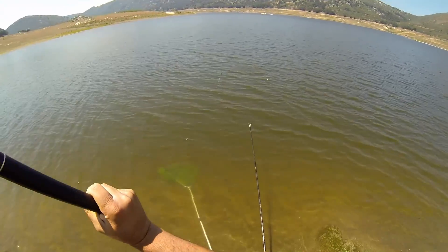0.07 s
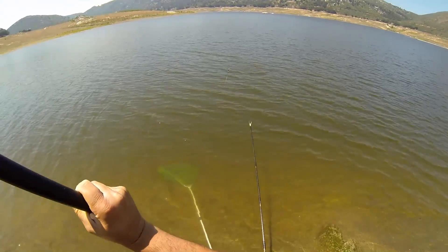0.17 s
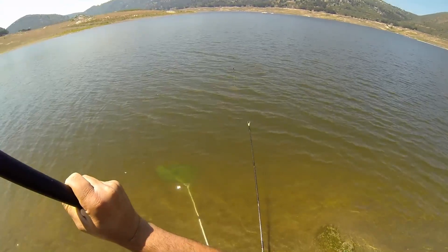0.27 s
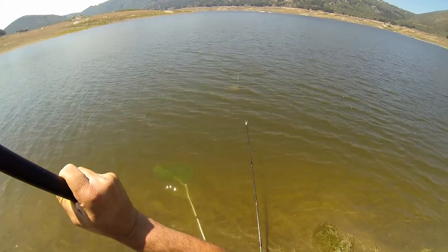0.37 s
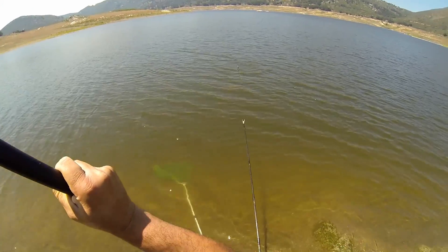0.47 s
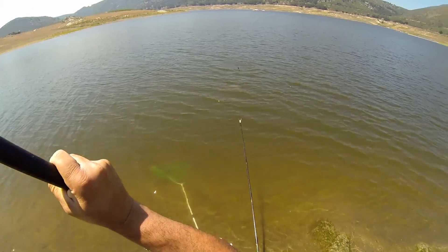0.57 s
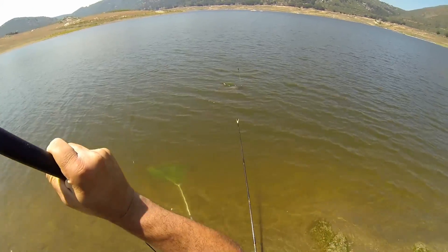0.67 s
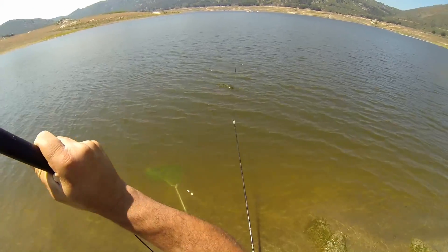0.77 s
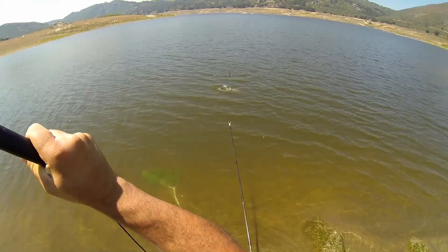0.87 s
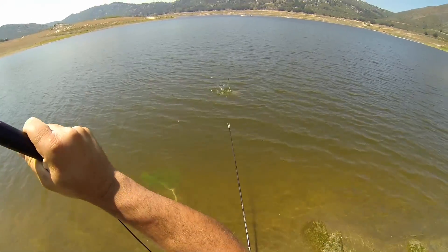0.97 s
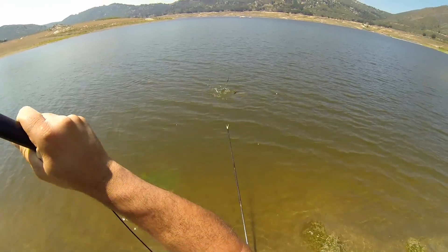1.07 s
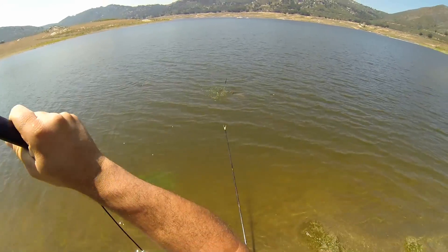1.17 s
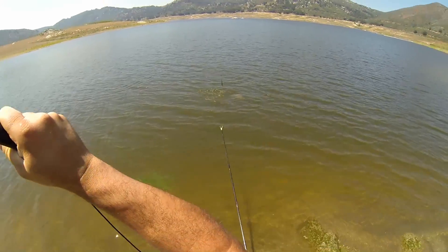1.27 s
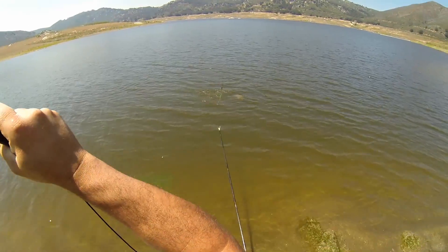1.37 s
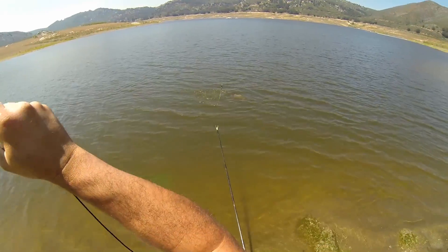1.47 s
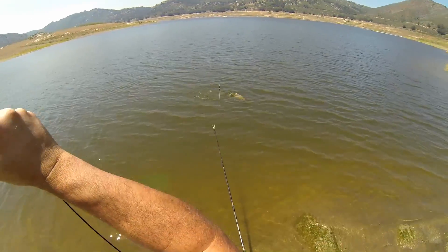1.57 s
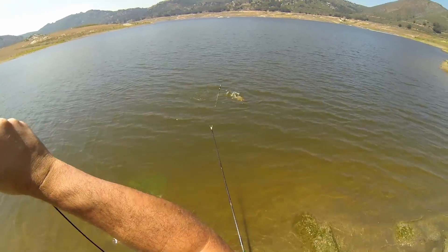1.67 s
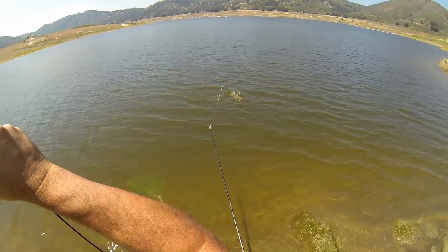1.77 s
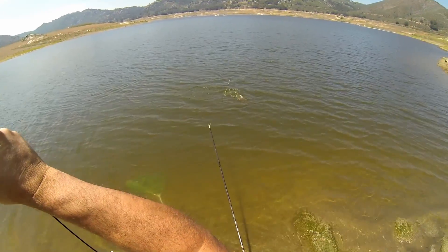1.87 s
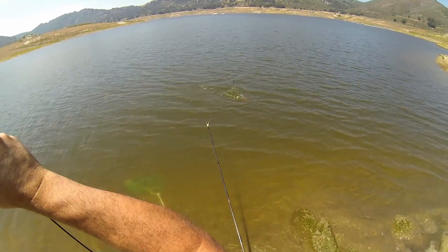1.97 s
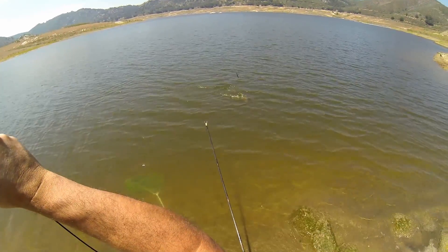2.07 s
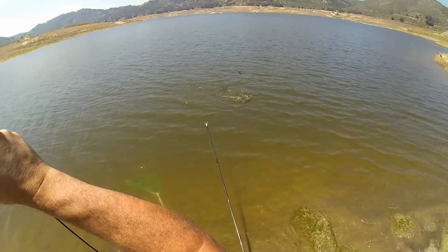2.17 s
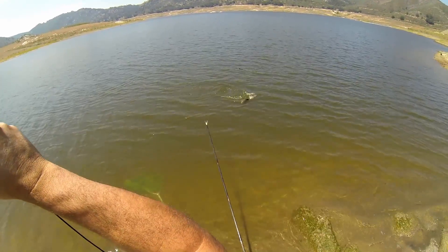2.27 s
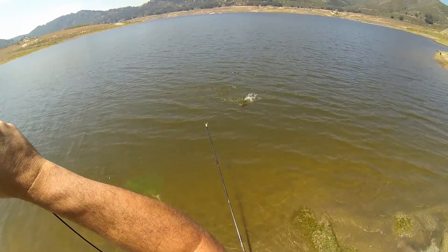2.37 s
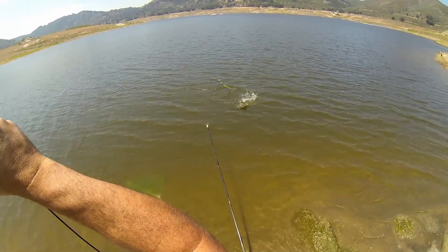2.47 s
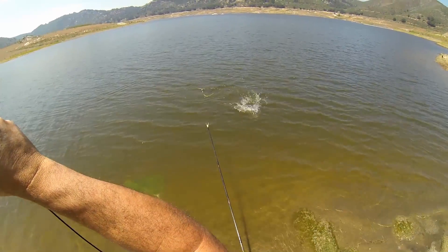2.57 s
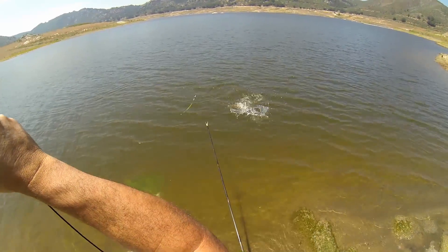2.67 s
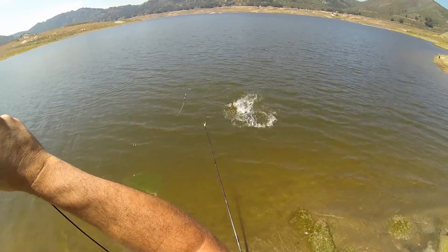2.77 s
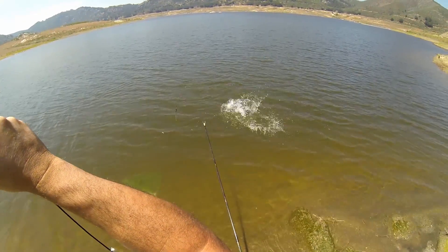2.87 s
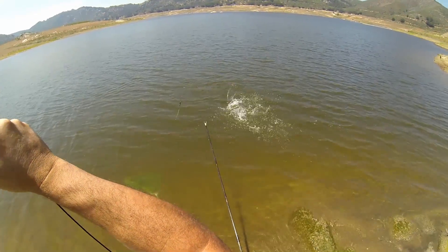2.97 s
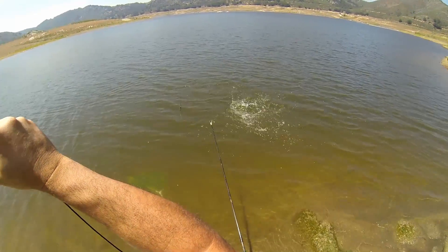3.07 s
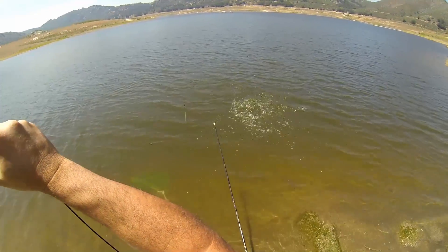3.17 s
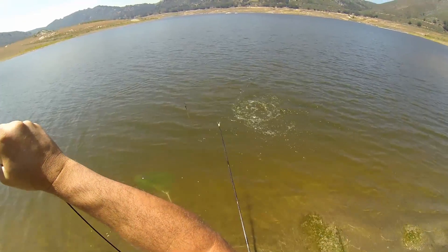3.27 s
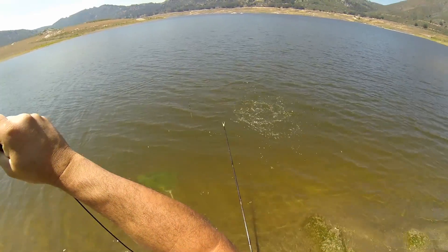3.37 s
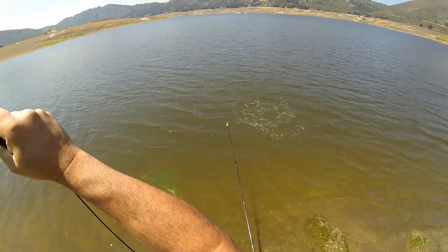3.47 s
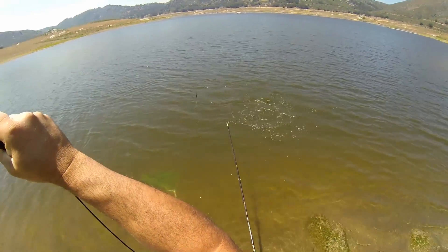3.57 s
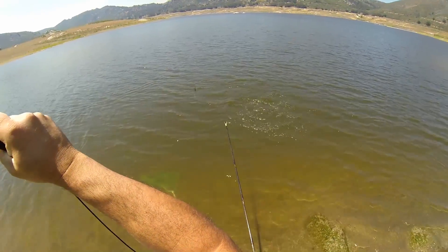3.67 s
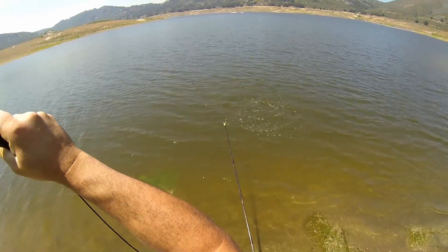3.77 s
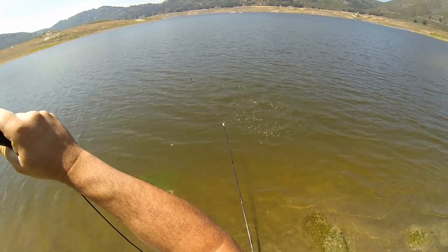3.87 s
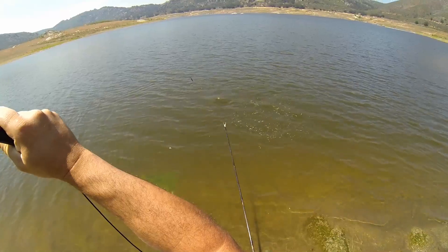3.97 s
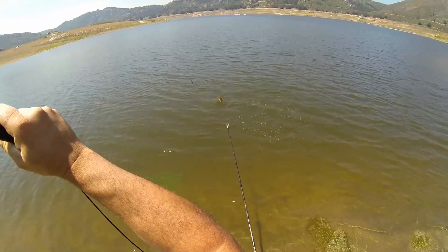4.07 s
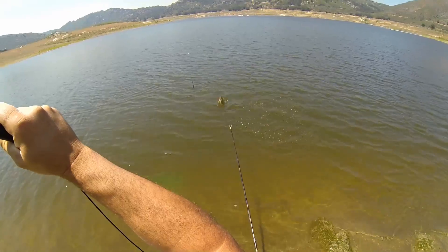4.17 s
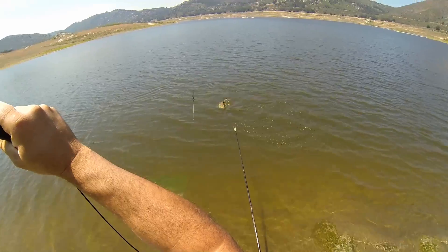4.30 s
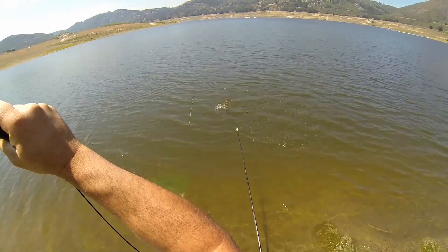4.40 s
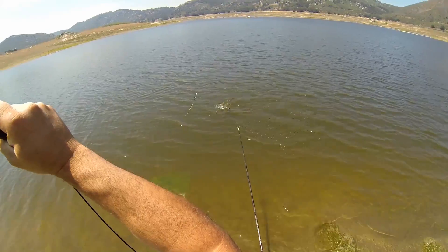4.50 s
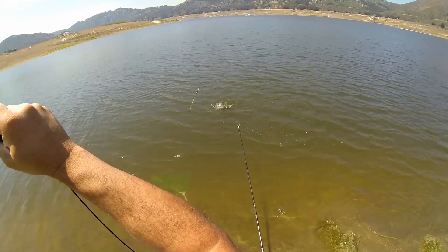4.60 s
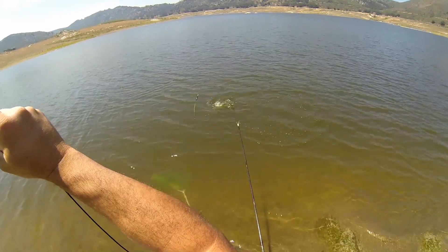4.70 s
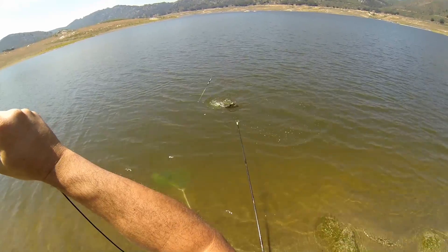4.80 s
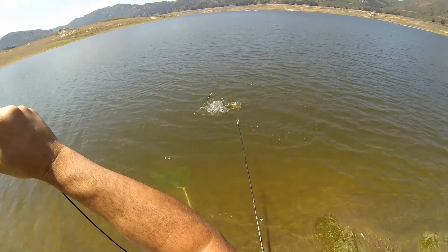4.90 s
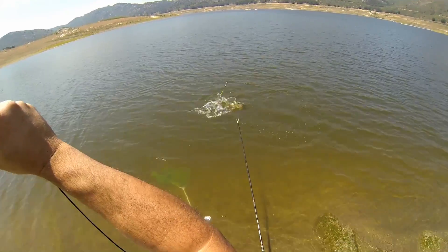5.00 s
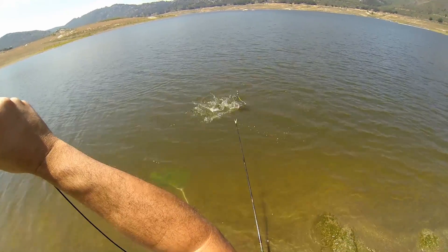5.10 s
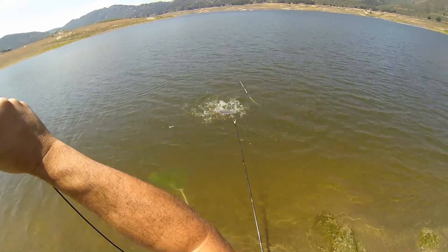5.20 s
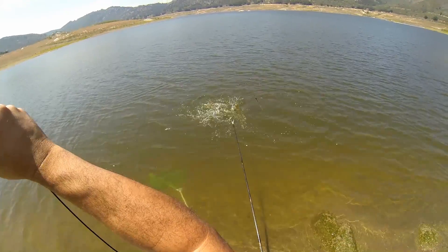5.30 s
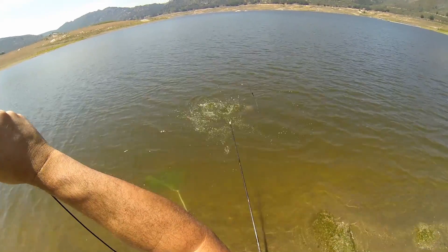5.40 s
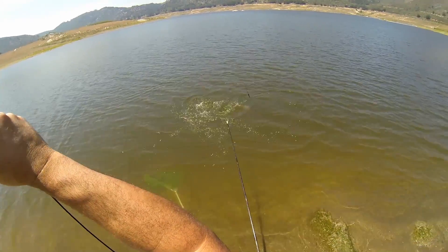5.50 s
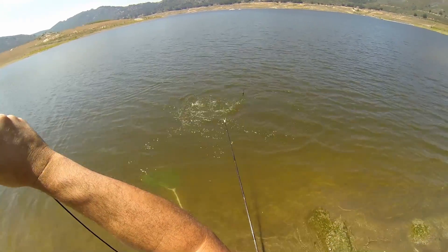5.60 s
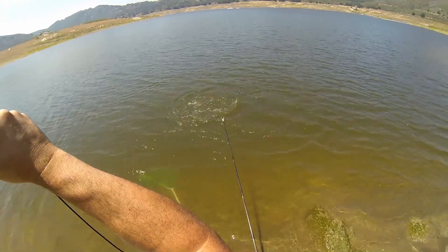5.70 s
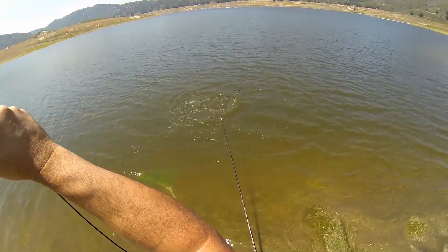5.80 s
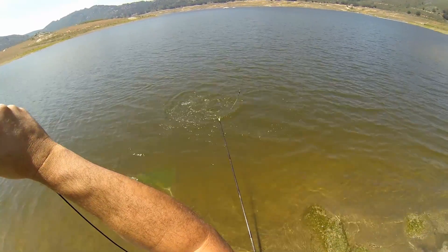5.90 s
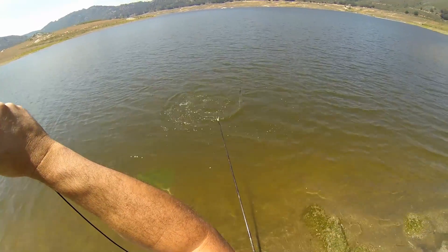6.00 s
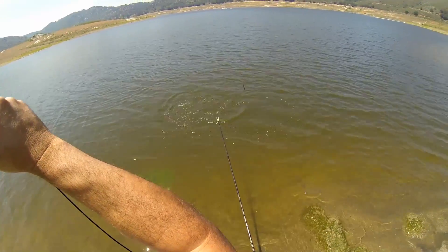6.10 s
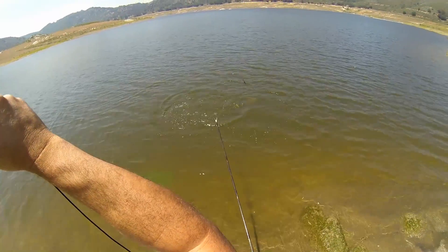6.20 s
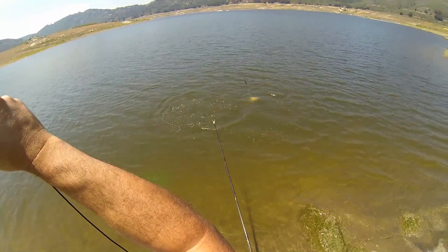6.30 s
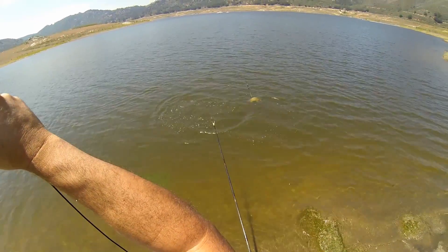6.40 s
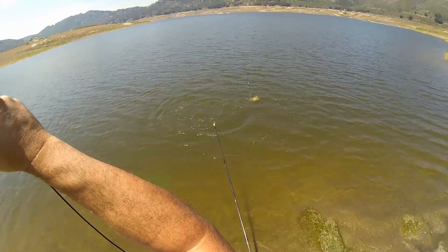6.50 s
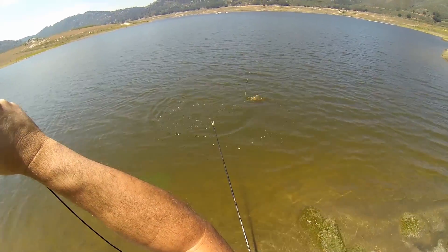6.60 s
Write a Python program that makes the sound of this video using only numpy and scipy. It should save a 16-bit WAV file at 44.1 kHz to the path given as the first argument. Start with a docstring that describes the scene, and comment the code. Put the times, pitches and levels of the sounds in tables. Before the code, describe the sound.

Outdoors on a lake, small gurgles and sharp slaps come from a fish fighting at the surface a few metres away. It thrashes harder, its body hitting the water with a heavy plunk, then pauses. A second, longer stretch of churning and spray fades into isolated plops. The small mono microphone also picks up soft wind rumble, slight hiss, a very faint distant cricket and a low hum near the end.

```python
"""A lake: a hooked fish thrashes at the surface, a few metres from a small head-worn camera with one mic.
Air pockets ring and glide in pitch, the tail slaps, the body slams, froth churns, spray patters back.
Light wind rumbles on the housing, a cricket trills far off, and a low hum comes and goes near the end.
The camera adds its own hiss and a thin whine."""
import sys
import numpy as np
from scipy import signal
from scipy.fft import rfft, irfft, next_fast_len
from scipy.io import wavfile
from scipy.ndimage import uniform_filter1d, map_coordinates

SR = 44100
rng = np.random.default_rng(int(sys.argv[2]) if len(sys.argv) > 2 else 0)


def wav_record(signal):
    """Record a signal, one row per channel, as 16-bit PCM in the file named by sys.argv[1]."""
    frames = np.transpose(np.atleast_2d(signal))
    bounded = np.clip(frames, -1, 1)
    # unit amplitude maps onto the largest positive 16-bit level
    quanta = np.round(bounded * 32767).astype(np.int16)
    wavfile.write(sys.argv[1], SR, quanta)


N = 293265


def amp(db):
    """dB to gain."""
    return 10 ** (np.asarray(db) / 20)


def unit(x):
    """x at rms 1."""
    return x / np.sqrt(np.mean(x ** 2) + 1e-20)


def curves(rows):
    """Each column after t/s, interpolated per sample."""
    t_s, *columns = np.transpose(rows)
    return [np.interp(np.arange(N) / SR, t_s, column) for column in columns]


def wobble(rate_hz):
    """Smooth random curve through Gaussian knots."""
    knots = rng.standard_normal(int(N * rate_hz / SR) + 4)
    return map_coordinates(knots, [np.arange(N) * rate_hz / SR])


def filtered(x, response):
    """x through a zero-phase gain response(f/Hz)."""
    n_fft = next_fast_len(N + 8192)
    return irfft(rfft(x, n_fft) * response(np.fft.rfftfreq(n_fft, 1 / SR)), n_fft)[..., :N]


def coloured(x, spectrum):
    """x shaped by (f/Hz, level/dB) rows, rms 1."""
    f_hz, db = np.transpose(spectrum)
    return unit(filtered(x, lambda hz: amp(np.interp(np.log(hz + 1), np.log(f_hz + 1), db))))


def patchy(x, depth_db=2):
    """x with random gain patches in time and frequency, rms 1."""
    spectra = signal.stft(x, nperseg=256)[2]
    patches = uniform_filter1d(rng.standard_normal(spectra.shape), size=5, axis=0)
    patches = unit(uniform_filter1d(patches, size=8, axis=1))
    return unit(signal.istft(spectra * amp(depth_db * patches), nperseg=256)[1][:N])


def glide(rows):
    """Sine following (t/s, f/Hz, level/dB) rows, silent outside them."""
    hz, db = curves(rows)
    t = np.arange(N) / SR
    active = (t > rows[0][0]) * (t < rows[-1][0])
    return amp(db) * active * np.sin(2 * np.pi * np.cumsum(hz) / SR)


def rings(onset_s, gain, hz, t60_s, rise_oct_s, attack_s, samples):
    """Sum of damped, gliding sines. A bubble's pitch climbs as it nears the surface."""
    t = np.arange(samples) / SR
    onset_s, gain, hz, t60_s, rise_oct_s, attack_s = (
        np.reshape(v, (-1, 1)) for v in (onset_s, gain, hz, t60_s, rise_oct_s, attack_s))
    octaves = rise_oct_s * t
    pitch_hz = hz * 2 ** np.clip(octaves, -2, 1.5)
    burst_fade = np.clip(4 * (1.5 - octaves), 0, 1)  # a bubble bursts at about triple its pitch
    envelope = gain * amp(-60 * t / t60_s) * (1 - np.exp(-t / attack_s)) * burst_fade
    waves = envelope * np.sin(2 * np.pi * np.cumsum(pitch_hz, axis=1) / SR)
    index = np.round(onset_s * SR).astype(int) + np.arange(samples)
    return np.bincount(index.ravel(), waves.ravel(), N + samples)[:N]


def swarm(count, lo_hz, hi_hz, cycles, spread_db, samples):
    """Random bubbles, a few much stronger than the rest; rms 1."""
    when, pitch, life, strength = rng.random((count, 4)).T
    hz = lo_hz * (hi_hz / lo_hz) ** pitch
    t60_s = cycles * (0.5 + 2.34 * life) / hz
    gain = amp(-spread_db * np.log(strength + 0.01)) * hz / hi_hz
    return unit(rings(when * N / SR, gain, hz, t60_s, 0.7 / t60_s, 0.5 / hz, samples))


def wind():
    """Lumpy rumble of wind on the housing."""
    spectrum = [(8.8, -21), (15, 2), (25, -2), (38, -4), (129, -16), (147, -27.5), (176, -31.5), (251, -28),
                (287, -23.5), (448, -36), (490, -28), (520, -39), (680, -36), (1140, -120)]  # rumble shape: f/Hz, level/dB
    gusts = [(0.0, -40), (0.22, -48), (0.31, -43), (0.46, -54), (0.52, -47), (0.63, -53.5), (0.7, -48),
             (0.91, -57.5), (0.93, -53), (1.41, -51), (1.44, -46.5), (1.55, -55), (2.0, -47), (2.11, -52.5),
             (2.56, -51.5), (2.63, -58), (2.68, -48.5), (2.85, -57), (2.87, -54), (3.18, -56), (4.2, -50.5),
             (4.52, -54.5), (4.58, -49.5), (5.61, -54), (5.72, -52), (5.85, -56.5), (6.13, -48.5),
             (6.18, -55.5), (6.48, -48.5), (6.65, -56.5)]  # rumble strength: t/s, level/dB
    buffeting = amp(1.44 * wobble(11) + 0.39 * wobble(4.9))
    rumble = unit(buffeting * coloured(rng.standard_normal(N), spectrum))
    return amp(curves(gusts)[0]) * rumble


def camera(hiss_db=-62, whine_hz=10645, whine_db=-88):
    """Self-noise: steady hiss and a thin whine that wavers in level."""
    spectrum = [(82, -45), (140, 1), (282, -8.5), (448, -9), (697, -11.5), (989, -14), (2110, -17),
                (2940, -16), (4330, -22), (5010, -21), (6030, -25), (8880, -27.5), (10100, -31.5),
                (10900, -33), (11500, -46), (15000, -68), (22000, -120)]  # hiss shape: f/Hz, level/dB
    tone = np.sqrt(2) * np.sin(2 * np.pi * whine_hz * np.arange(N) / SR)
    whine = amp(whine_db + 1.5 * wobble(20)) * tone
    return amp(hiss_db) * coloured(rng.standard_normal(N), spectrum) + whine


def cricket(wing_hz=5165, strokes_per_s=47.94, level_db=-78):
    """Far trill: each wing stroke sags in pitch; every fifteenth is skipped."""
    stroke = np.arange(int(N / SR * strokes_per_s))
    stroke = stroke[stroke % 15 != 1]
    strength, detune = rng.standard_normal((len(stroke), 2)).T
    onset_s = np.clip((stroke - 0.2) / strokes_per_s, 0, None)
    hz = wing_hz * (1 + 0.005 * detune)
    song = rings(onset_s, amp(1.3 * strength), hz, t60_s=0.045, rise_oct_s=-3, attack_s=0.006, samples=900)
    return amp(level_db) * unit(song)


def thrash(patter_db=-13):
    """Froth (ringing bubbles) and spray (fizz grains, landing drops), each mixed with rushing noise."""
    churn = [(0.6, -96, -100), (0.83, -67, -89), (0.95, -62, -75), (1.08, -60, -75), (1.2, -61, -75),
             (1.41, -73, -85), (1.54, -62.5, -65), (1.73, -55.5, -65), (1.95, -63, -72.5), (2.07, -68, -77),
             (2.2, -59.5, -73), (2.4, -67, -77), (2.52, -54.5, -66), (2.64, -52, -59), (2.72, -46, -52),
             (2.85, -44.5, -52), (2.97, -42, -52.5), (3.1, -51.5, -58), (3.3, -63, -69.5),
             (3.45, -65, -103), (4.09, -75.5, -73), (4.29, -59, -66), (4.43, -63, -76), (4.59, -64.5, -67),
             (4.66, -52.5, -64.5), (4.74, -46, -63.5), (4.84, -50.5, -63), (4.94, -50.5, -59.5),
             (5.0, -44.5, -54.5), (5.13, -44.5, -53.5), (5.25, -48.5, -54.5), (5.36, -50.5, -55),
             (5.5, -55.5, -61), (5.56, -58, -66.5), (5.62, -59, -69), (5.75, -74, -78), (6.65, -104, -90)]  # churned water: t/s, froth level/dB, spray level/dB
    froth_shape = [(88, -50), (150, -11), (366, -7.5), (514, -4.5), (643, -3.5), (787, -7), (903, -3),
                   (1490, -7.5), (1900, -18.5), (2470, -23), (4180, -120)]  # froth spectrum: f/Hz, level/dB
    spray_shape = [(880, -45), (1500, -5), (1840, -11), (2110, -3), (2520, -12), (4000, -10.5), (5430, -20),
                   (6330, -22.5), (6900, -14), (8100, -17.5), (10300, -28.5), (10800, -28), (11500, -90),
                   (15000, -84), (22000, -120)]  # spray spectrum: f/Hz, level/dB
    froth = swarm(count=5000, lo_hz=198, hi_hz=2676, cycles=16.7, spread_db=2.2, samples=900)
    spray = swarm(count=14000, lo_hz=1787, hi_hz=11730, cycles=13.7, spread_db=2.0, samples=260)
    froth = patchy(coloured(froth + 2.0 * rng.standard_normal(N), froth_shape))
    spray = patchy(coloured(spray + 1.8 * rng.standard_normal(N), spray_shape))
    patter = swarm(count=1500, lo_hz=2470, hi_hz=10100, cycles=6.9, spread_db=3.5, samples=120)
    spray += amp(patter_db) * coloured(patter, spray_shape)
    surge = np.tanh(wobble(21.827))  # water falls in lumps
    froth_db, spray_db = curves(churn)
    sheet_froth, sheet_spray = sheets()
    froth_gain = amp(froth_db + 1.3 * surge) + sheet_froth
    spray_gain = amp(spray_db + 0.91 * surge + 2.0 * wobble(35)) + sheet_spray
    return froth_gain * froth + spray_gain * spray


def pockets(attack_cycles=0.65, attack_spread_db=4, waver_s=0.00008):
    """Large air pockets ring: some pop, others swell. Ripples shift the sound path, so pitch wavers."""
    air_pockets = [(0.838, -50, 1380, 0.033, -4), (0.848, -48.5, 2000, .04, 21),
                   (0.852, -44.5, 609, 0.17, -0.5), (0.883, -48.5, 1156, 0.069, 27),
                   (0.926, -33.5, 990, 0.025, 38), (0.929, -42, 1700, .02, 40), (.914, -44, 555, .04, 0),
                   (0.933, -39, 935, 0.057, 122), (0.94, -44, 1870, 0.027, -39),
                   (0.943, -45.5, 690, 0.24, 9), (0.953, -49, 1610, 0.028, 30),
                   (0.965, -46, 2200, 0.027, 3), (0.972, -51, 1100, 0.09, 0.5), (1.01, -39, 785, 0.035, 3),
                   (1.028, -45, 1990, 0.027, 34), (1.189, -47.5, 2140, 0.034, -3),
                   (1.585, -31.5, 564, 0.055, 13.5), (1.599, -37, 700, .035, 17),
                   (1.605, -35.5, 1560, 0.017, 1), (1.65, -46, 1070, 0.037, 18),
                   (1.66, -44, 1265, 0.08, -14.5), (1.691, -47, 843, .12, -1.5),
                   (1.719, -39.5, 1470, 0.037, 9), (1.725, -47.5, 600, 0.16, -12.5),
                   (1.74, -49, 2250, 0.044, 1), (1.745, -56, 810, .1, 31), (1.782, -54, 428, 0.15, 15.5),
                   (1.816, -39.5, 674, 0.058, 6), (1.821, -33.5, 760, 0.05, 15),
                   (1.837, -49, 1310, 0.049, 22), (1.932, -51, 1127, 0.14, 21.5),
                   (2.005, -46.5, 470, .075, 2), (2.017, -56, 2010, .04, -2), (2.019, -49, 2800, 0.022, 2),
                   (2.078, -50.5, 801, 0.13, 2), (2.11, -52.5, 1200, 0.075, 37),
                   (2.151, -55, 1520, 0.046, 17), (2.167, -48.5, 395, 0.13, 65),
                   (2.208, -38.5, 526, 0.029, -74), (2.246, -48.5, 557, 0.12, 22.5),
                   (2.284, -47, 578, 0.1, -16), (2.308, -43, 578, 0.15, 17), (2.311, -32, 1030, 0.032, 25),
                   (2.333, -47, 742, 0.12, 21), (2.369, -43.5, 534, 0.15, 26.5),
                   (2.376, -46.5, 2040, 0.037, 15), (2.403, -35, 1036, .05, -7),
                   (2.413, -29, 1100, 0.043, -11), (2.414, -33.5, 383, 0.056, -0.5),
                   (2.44, -49, 1120, 0.054, 4), (2.474, -31.5, 680, 0.027, -30),
                   (2.361, -44, 1600, .025, -10), (2.395, -41, 920, 0.033, 3), (2.526, -37, 990, 0.04, -25),
                   (2.292, -50, 1510, 0.024, 10), (2.484, -44, 416, 0.047, -7),
                   (2.655, -41.5, 740, 0.1, -8.5), (2.688, -41, 347, 0.17, 18.5),
                   (2.691, -40, 673, 0.12, -10), (2.704, -33, 1600, 0.022, -53),
                   (2.705, -36, 622, 0.16, 51), (2.726, -39, 611, 0.17, 22), (2.727, -33, 1103, 0.053, -32),
                   (2.752, -38, 654, 0.062, -21.5), (2.774, -36, 403, .04, -10),
                   (2.834, -34.5, 594, 0.045, -47), (2.839, -27.5, 1100, 0.026, -75),
                   (2.895, -23, 560, 0.058, -9), (2.869, -36, 1060, .03, -5), (2.913, -35, 400, .04, 10),
                   (2.901, -29, 1030, 0.056, -4.5), (2.909, -31, 1093, 0.048, 10),
                   (2.926, -26, 510, 0.053, -41), (2.946, -43, 493, 0.74, 12), (2.974, -30, 1200, 0.021, 0),
                   (2.978, -38, 1440, 0.09, -1.5), (2.995, -37, 1550, 0.043, 4),
                   (2.948, -38, 520, 0.023, 0), (3.035, -40, 530, 0.027, 4),
                   (3.096, -40.5, 1030, 0.025, -9), (2.741, -41, 1200, .03, 0), (2.805, -37, 900, .03, 0),
                   (2.823, -42, 1200, .025, 0), (2.989, -38, 704, 0.14, -21.5),
                   (3.018, -31.5, 1083, 0.037, 36), (3.053, -46, 817, 0.18, 0), (3.09, -40, 660, 0.037, -2),
                   (3.14, -46, 1132, 0.19, 14), (3.246, -45.5, 1060, 0.07, -6),
                   (3.343, -57, 1060, 0.065, 1), (3.395, -46, 1050, 0.065, -2),
                   (3.471, -50.5, 1110, 0.054, 3), (4.082, -50, 1020, 0.042, -2),
                   (4.19, -43.5, 920, 0.056, 3), (4.205, -49, 1037, 0.16, 21), (4.227, -44, 1120, 0.05, -3),
                   (4.29, -37.5, 960, 0.061, 26), (4.349, -36.5, 573, 0.028, -86),
                   (4.351, -46.5, 420, 0.18, 20.5), (4.391, -52, 970, .08, 25),
                   (4.41, -51.5, 760, 0.14, -5), (4.443, -47, 700, 0.028, -6),
                   (4.474, -32.5, 737, 0.036, -23), (4.479, -40, 1920, 0.05, 4),
                   (4.583, -24.5, 440, 0.043, 3), (4.623, -28, 313, 0.087, 2), (4.65, -40.5, 369, 0.22, -9),
                   (4.598, -43, 1120, .03, 17), (4.648, -37, 1200, 0.025, 5), (4.654, -45, 2080, .04, 1),
                   (4.712, -32, 249, 0.11, -2), (4.717, -26, 640, 0.02, 117), (4.717, -32, 465, 0.036, -62),
                   (4.733, -26.5, 795, 0.013, 136), (4.775, -40, 620, 0.031, -9),
                   (4.79, -39, 550, 0.075, -22), (4.815, -39, 963, 0.048, 13), (4.817, -45, 2080, .03, 2),
                   (4.877, -24, 267, 0.03, 24), (4.895, -38, 1600, .03, 30), (4.882, -37, 503, 0.075, 35),
                   (4.915, -31.5, 737, 0.05, 60), (4.934, -39, 331, 0.17, 30.5),
                   (4.957, -35.5, 350, 0.13, 15), (4.978, -34, 828, 0.068, 21.5),
                   (4.994, -30.5, 640, 0.048, 8.5), (5.002, -34, 800, 0.045, 37),
                   (5.021, -30.5, 800, 0.065, -58), (5.059, -24.5, 355, 0.038, 3),
                   (5.079, -33.5, 532, 0.11, 42.5), (5.09, -30.5, 612, 0.07, -0.5),
                   (5.107, -35.5, 665, 0.15, 13), (5.12, -37, 707, 0.11, -12.5),
                   (5.157, -37, 1130, 0.04, 8), (5.012, -41, 1090, .05, 5), (5.073, -40, 2250, .025, 0),
                   (5.087, -39, 2060, 0.048, 15), (5.091, -34, 1150, 0.034, 13), (5.135, -37, 470, .06, -7),
                   (5.179, -43, 1560, .03, 0), (5.181, -47, 2080, .03, 0), (5.312, -37, 650, .03, 0),
                   (5.193, -35, 654, 0.074, 1), (5.221, -33, 1230, .031, -43), (5.272, -37, 1568, 0.08, 5),
                   (5.363, -38.5, 740, 0.066, -1), (5.427, -41.5, 600, 0.11, 15.5),
                   (5.292, -39, 950, .04, 10), (5.297, -44.5, 394, 0.085, 18),
                   (5.335, -40.5, 2080, 0.026, -4), (5.398, -43, 1005, 0.036, 10),
                   (5.482, -42, 678, 0.095, -2), (5.506, -47, 713, 0.087, -9),
                   (5.562, -53, 631, 0.52, 34.5), (5.597, -44, 290, 0.29, 1.5), (5.62, -50, 1190, .04, 23),
                   (5.63, -40, 1610, 0.039, 3), (5.633, -45, 1900, 0.027, 5), (5.593, -47, 1350, .04, -8),
                   (5.645, -59, 950, .08, 8), (6.105, -46.5, 1036, 0.078, 4.5),
                   (6.431, -53, 2600, 0.038, 4), (6.499, -53.5, 1590, 0.044, 5),
                   (6.548, -48.5, 690, .053, 22), (6.105, -62, 2200, .03, 2), (6.629, -43, 2760, 0.03, -1),
                   (6.635, -45, 696, 0.036, 59)]  # trapped air: t/s, level/dB, start f/Hz, t60/s, rise/(oct/s)
    onset_s, db, hz, t60_s, rise_oct_s = np.transpose(air_pockets)
    attack_s = attack_cycles * amp(attack_spread_db * rng.standard_normal(len(hz))) / hz
    plops = rings(onset_s, amp(db), hz, t60_s, rise_oct_s, attack_s, samples=9000)
    plops += spatter(onset_s, db, hz)
    return map_coordinates(plops, [np.arange(N) + waver_s * SR * wobble(160)])


def spatter(parent_s, parent_db, parent_hz, max_db=-12, max_lag_s=0.03, t60_cycles=13, span_oct=1.39):
    """Each pocket or slap tears off four weaker, mostly smaller bubbles."""
    lag, pitch, weakness = np.moveaxis(rng.random((len(parent_s), 4, 3)), 2, 0)
    onset_s = parent_s[:, None] + max_lag_s * lag
    hz = parent_hz[:, None] * 2 ** (span_oct * (pitch - 0.2))
    gain = amp(parent_db[:, None] + max_db - 8.6 * weakness)
    t60_s = t60_cycles / hz
    return rings(onset_s, gain, hz, t60_s, 0.35 / t60_s, 0.71 / hz, samples=2000)


def slaps(t60_cycles=9, sag_oct_per_cycle=0.12, attack_cycles=0.36):
    """The tail slaps the surface: short rings that sag in pitch."""
    hits = [(0.849, -39, 1270), (0.968, -31, 1200), (1.652, -36, 1150), (1.948, -38, 1480),
            (1.962, -37.5, 920), (2.365, -32, 1180), (2.417, -29, 2020), (2.42, -24, 1530),
            (2.423, -29, 2200), (2.467, -28, 1790), (2.47, -28.5, 1300), (2.506, -36, 1360),
            (2.569, -27, 1260), (2.572, -32, 2200), (2.576, -26.5, 2700), (2.607, -30.5, 1600),
            (2.999, -25, 1190), (4.189, -31, 1300), (4.245, -35, 1390), (4.334, -37, 2400),
            (4.353, -41, 1990), (4.433, -33, 1890), (4.485, -27.5, 1990), (4.544, -31.5, 1690),
            (4.705, -29, 670), (4.877, -37, 1100), (4.714, -23, 1300), (4.731, -28, 1250),
            (5.131, -22.5, 2800), (5.148, -30, 1260), (5.313, -27, 1410), (5.478, -31, 1310),
            (6.631, -33, 2180), (6.632, -30.5, 990)]  # tail hits: t/s, level/dB, start f/Hz
    onset_s, db, hz = np.transpose(hits)
    rise_oct_s = -sag_oct_per_cycle * hz
    smacks = rings(onset_s, amp(db), hz, t60_cycles / hz, rise_oct_s, attack_cycles / hz, samples=1500)
    return smacks + spatter(onset_s, db - 2, hz)


def ticks():
    """Single drops strike the surface: a short ring and a crack of eight tiny bubbles."""
    drops = [(0.8648, -47, 3690, -74), (0.9125, -47.5, 3650, -68), (1.019, -50, 4020, -57),
             (1.053, -51, 4030, -68), (1.1908, -55, 4000, -52), (1.2294, -47, 4700, -58),
             (2.3716, -51, 3200, -64), (2.411, -40, 7600, -61), (2.4182, -38, 3350, -62),
             (2.468, -52, 3100, -64), (2.571, -48, 3180, -46.5), (2.617, -43, 3100, -46),
             (2.704, -41, 3140, -59), (2.678, -52, 4200, -60), (2.7295, -50, 6860, -58),
             (2.7904, -42, 7490, -46), (2.824, -54, 3120, -44), (2.9514, -55, 3920, -60),
             (2.975, -35.5, 3530, -63), (2.995, -44, 4000, -58), (3.068, -43, 4300, -58),
             (3.117, -41.5, 8100, -52), (3.1875, -54, 7000, -51), (3.155, -45, 3160, -64.5),
             (3.226, -63, 3280, -52), (4.3335, -37, 7250, -35), (4.3395, -37, 3900, -39),
             (4.34, -33, 7160, -41), (4.3535, -40, 7300, -50), (4.4417, -48, 3900, -73),
             (4.5443, -39.5, 7450, -52), (4.603, -49, 3040, -71), (4.613, -41.5, 4070, -64),
             (4.621, -42, 3140, -64), (4.7143, -52, 4050, -67), (4.975, -54, 3040, -46.5),
             (5.032, -40, 3950, -63), (5.131, -33, 2930, -61), (5.2465, -53, 4230, -57),
             (5.2695, -45, 7610, -49), (5.323, -40, 3640, -53), (5.327, -42, 7770, -52),
             (5.367, -42, 3160, -59), (5.483, -53, 3640, -60), (5.5033, -44, 3360, -52),
             (5.6454, -45, 3750, -70), (6.61, -46, 3750, -69)]  # spray drops: t/s, ring level/dB, ring f/Hz, crack level/dB
    onset_s, db, hz, crack_db = np.transpose(drops)
    sound = rings(onset_s, amp(db + 2.5), hz, t60_s=32 / hz, rise_oct_s=0, attack_s=1.5 / hz, samples=500)
    for lag, pitch in np.transpose(rng.random((len(hz), 8, 2)), (1, 2, 0)):
        sound += rings(onset_s + 0.003 * lag ** 2, amp(crack_db), hz=3300 * 2.9 ** pitch,
                       t60_s=0.0034, rise_oct_s=0, attack_s=0.0001, samples=500)
    return sound


def sheets(rise_s=0.0073, fall_s=0.012):
    """Froth and spray envelopes of sheets of water thrown up."""
    throws = [(0.87, -68, -75), (0.95, -53, -65), (1.03, -77, -61), (1.83, -59, -64), (1.91, -84, -68),
              (1.95, -62, -64), (2.011, -67, -66), (2.301, -75, -63), (2.372, -48.5, -59.5),
              (2.414, -49, -49), (2.428, -59, -65), (2.468, -51, -59), (2.569, -53, -58), (2.84, -59, -57),
              (2.9, -61, -62), (2.98, -46, -67), (3.16, -77, -63.5), (4.29, -68, -76), (4.336, -73, -51.5),
              (4.352, -59, -57), (4.44, -54.5, -58.5), (4.611, -57, -67), (4.841, -70, -71),
              (4.895, -49, -66), (4.999, -46.5, -56), (5.121, -42, -55), (6.63, -68, -68)]  # sheet peaks: t/s, froth level/dB, spray level/dB
    peak_s, *db = np.transpose(throws)
    age_s = np.arange(N) / SR - peak_s[:, None]
    return amp(db) @ np.exp(-np.abs(age_s) / np.where(age_s < 0, rise_s, fall_s))


def plunge():
    """The body slams the water, opening and closing a cavity."""
    cavities = [(2.568, -31, 260, 0.017, -16, 0.00074), (2.5694, -30, 610, 0.013, -1, 0.00034),
                (2.884, -3.5, 316, 0.016, -63, 0.0018), (2.882, -22, 970, 0.022, 3, 0.00044),
                (2.8878, -3, 450, 0.016, 91, 0.001)]  # cavity rings: t/s, level/dB, start f/Hz, t60/s, rise/(oct/s), attack/s
    onset_s, db, hz, t60_s, rise_oct_s, attack_s = np.transpose(cavities)
    return rings(onset_s, amp(db), hz, t60_s, rise_oct_s, attack_s, samples=1500)


def hum():
    """Low wavering hum that comes and goes."""
    track = [(5.62, 100, -81), (5.7, 97.2, -49), (5.8, 94.7, -60), (5.95, 101.4, -67), (6.05, 99.8, -51.5),
             (6.12, 106.4, -44), (6.2, 112.8, -60), (6.3, 89.8, -53), (6.38, 93.1, -49), (6.5, 96.9, -47.5),
             (6.65, 99.5, -47)]  # hum tone: t/s, f/Hz, level/dB
    return amp(2.4 * wobble(25)) * glide(track)


def gulp():
    """A cavity closes at the surface: its pitch dips, then climbs."""
    track = [(5.65, 596, -74), (5.67, 516, -65), (5.70, 426, -58), (5.73, 490, -60), (5.76, 760, -55.5),
             (5.778, 1245, -55), (5.79, 1500, -73)]  # cavity tone: t/s, f/Hz, level/dB
    return glide(track)


def scene(gurgle_db=1.7):
    """One microphone feeds both channels."""
    plops = pockets() + gulp()
    impacts = slaps() + plunge()
    gurgle = amp(gurgle_db * wobble(110))  # the ringing flutters in level
    mono = gurgle * plops + impacts + ticks() + thrash() + cricket() + wind() + hum() + camera()
    return np.array([mono, mono])


def record(dry, top_hz=11670):
    """The camera's band limit: brick-wall low-pass."""
    return filtered(dry, lambda hz: hz < top_hz)


dry = scene()
out = record(dry)
wav_record(out)
```